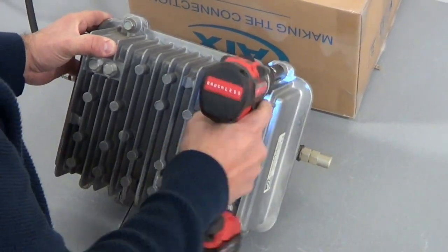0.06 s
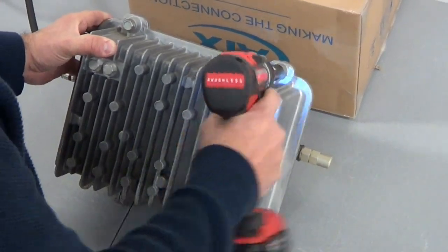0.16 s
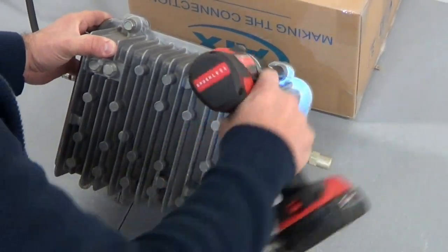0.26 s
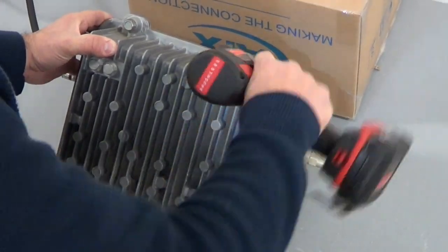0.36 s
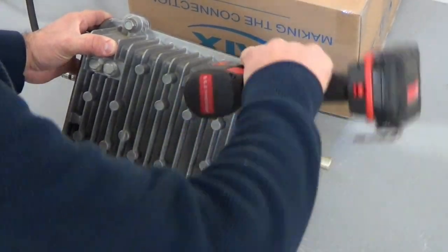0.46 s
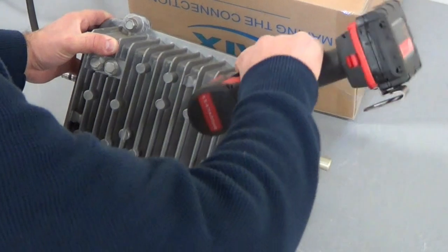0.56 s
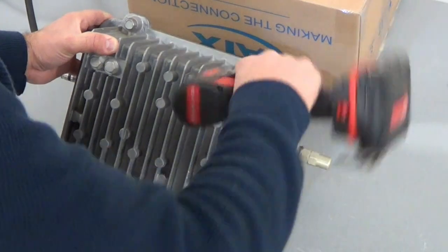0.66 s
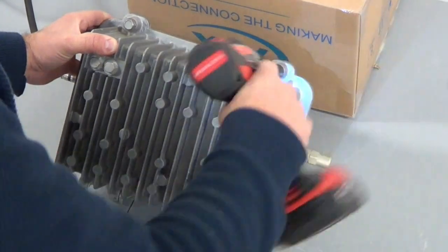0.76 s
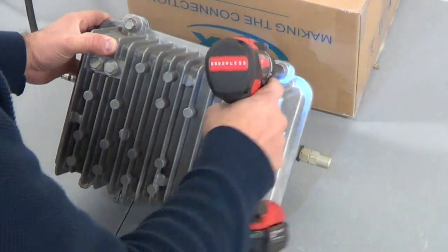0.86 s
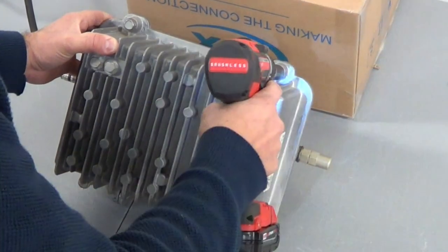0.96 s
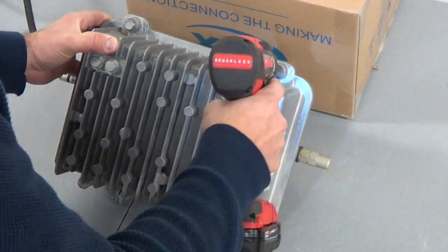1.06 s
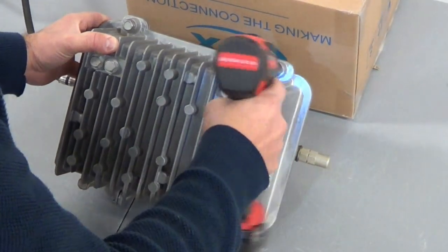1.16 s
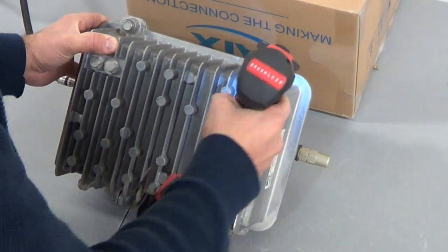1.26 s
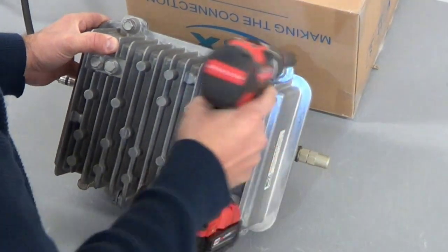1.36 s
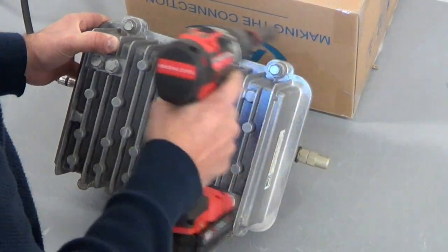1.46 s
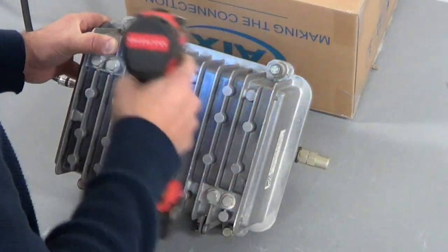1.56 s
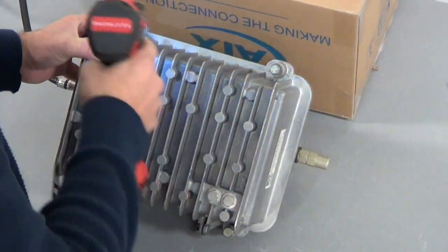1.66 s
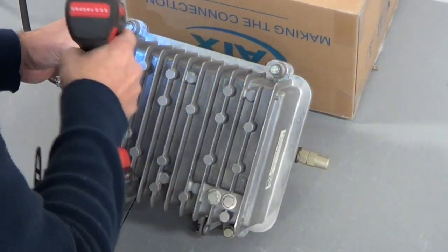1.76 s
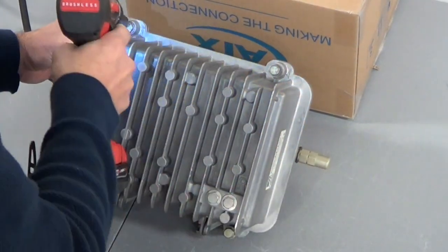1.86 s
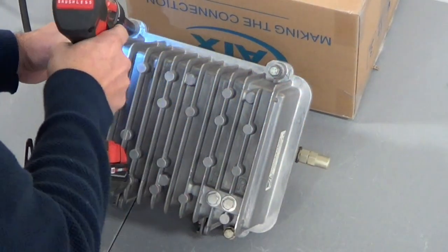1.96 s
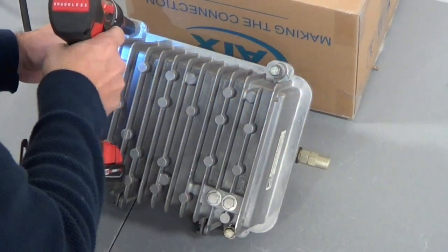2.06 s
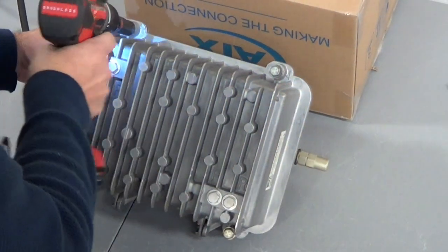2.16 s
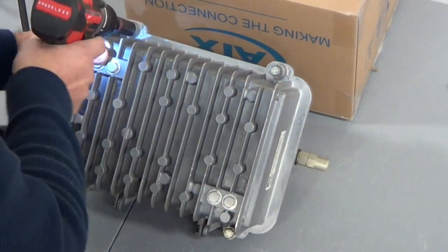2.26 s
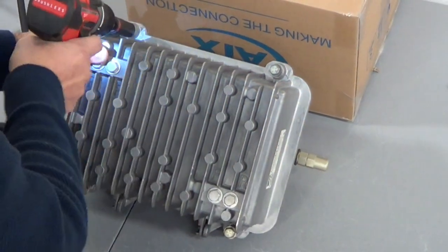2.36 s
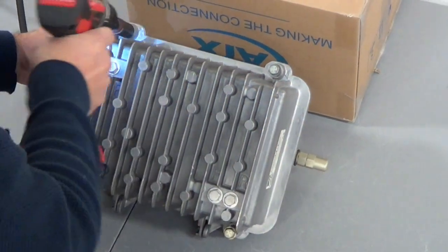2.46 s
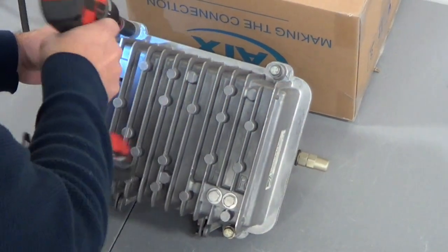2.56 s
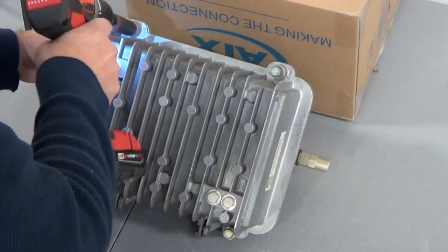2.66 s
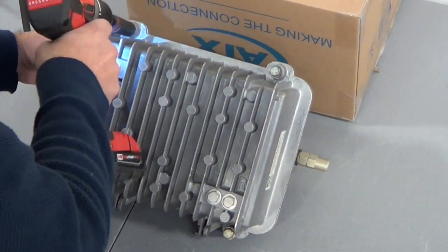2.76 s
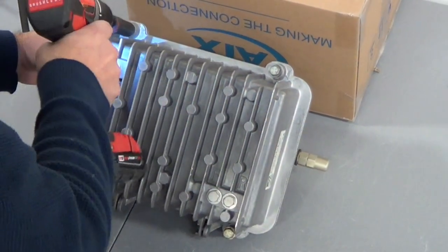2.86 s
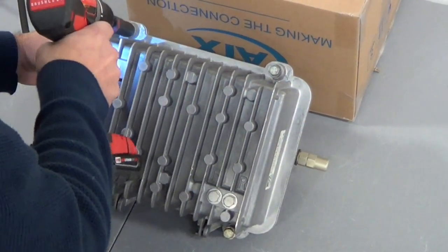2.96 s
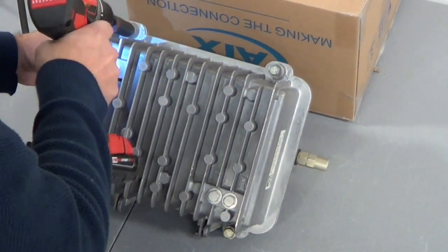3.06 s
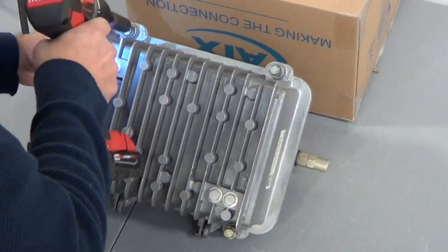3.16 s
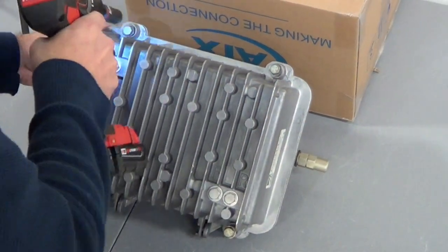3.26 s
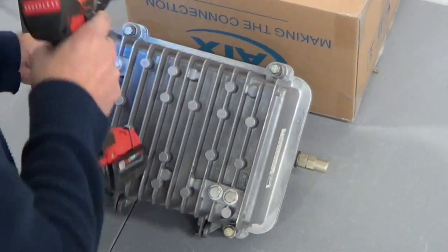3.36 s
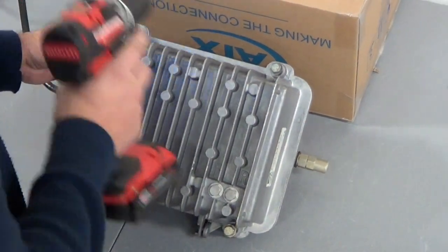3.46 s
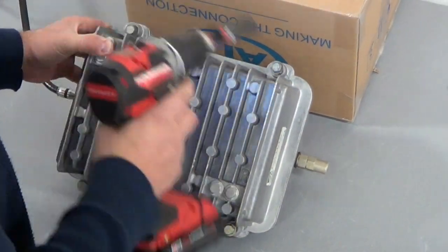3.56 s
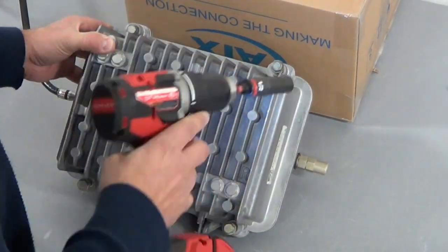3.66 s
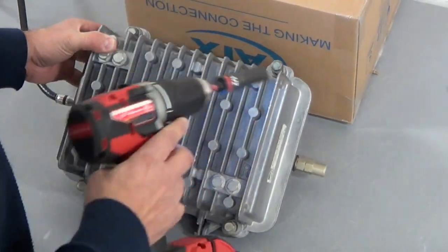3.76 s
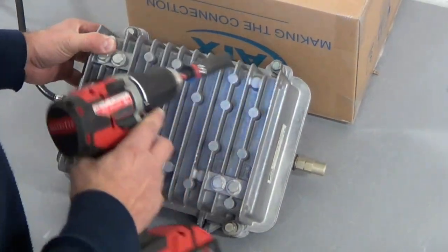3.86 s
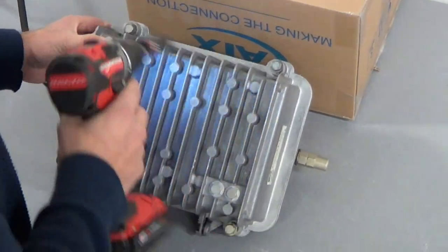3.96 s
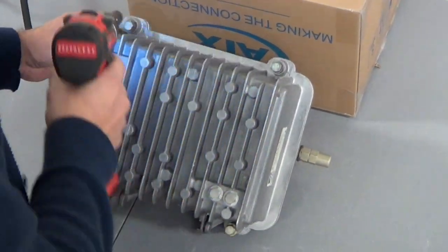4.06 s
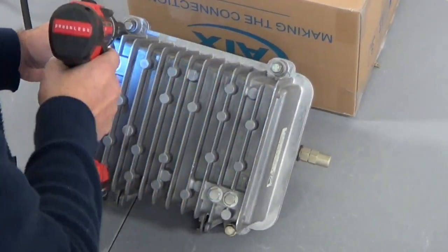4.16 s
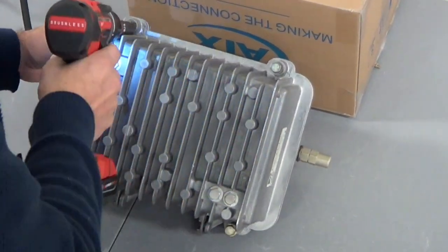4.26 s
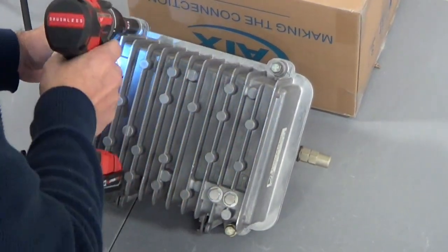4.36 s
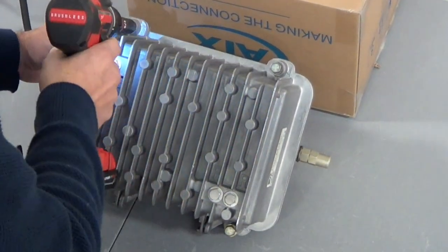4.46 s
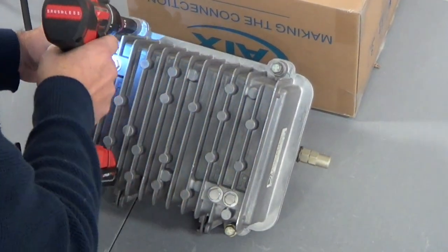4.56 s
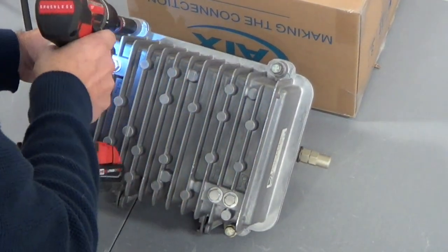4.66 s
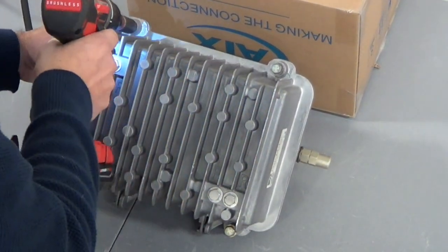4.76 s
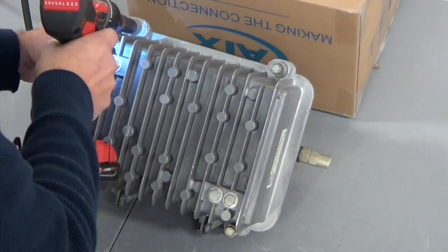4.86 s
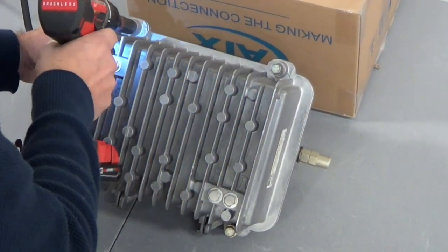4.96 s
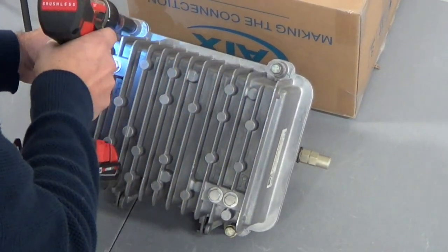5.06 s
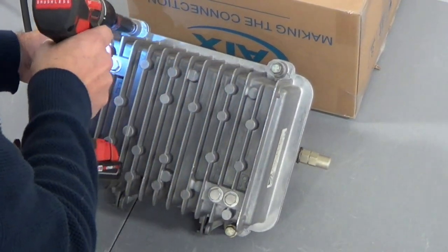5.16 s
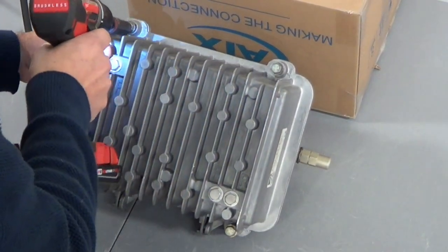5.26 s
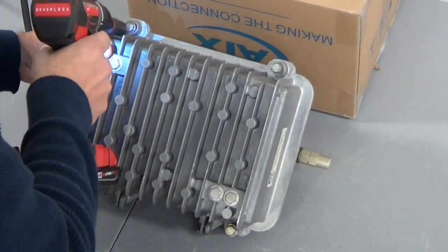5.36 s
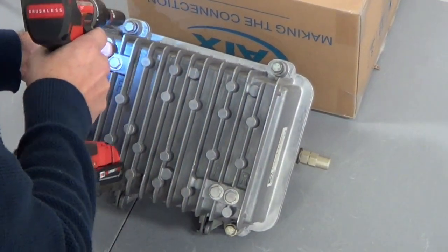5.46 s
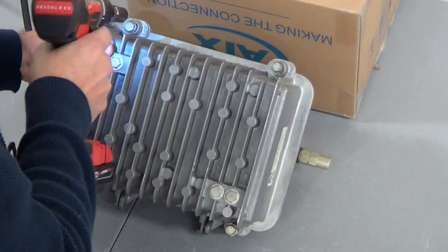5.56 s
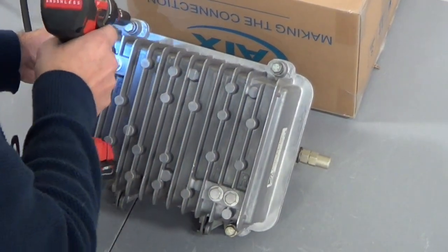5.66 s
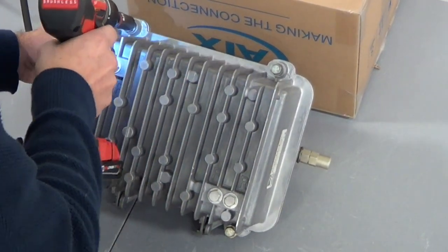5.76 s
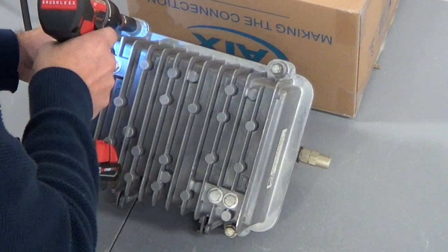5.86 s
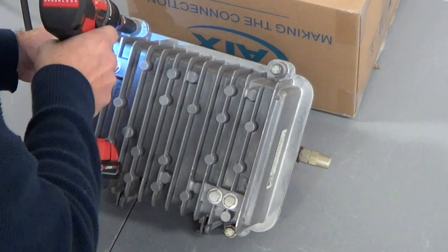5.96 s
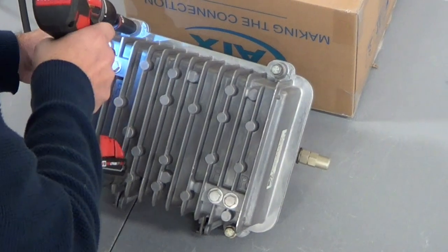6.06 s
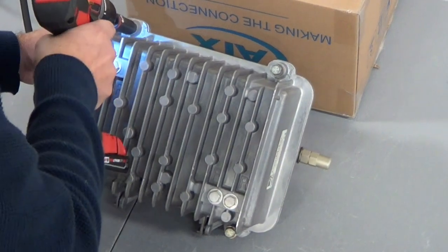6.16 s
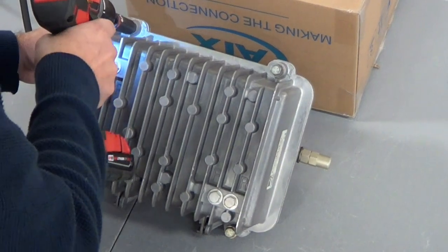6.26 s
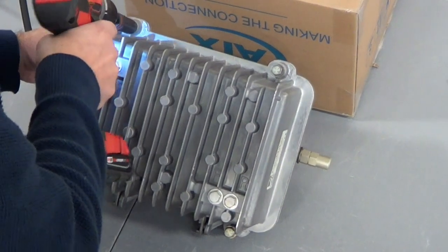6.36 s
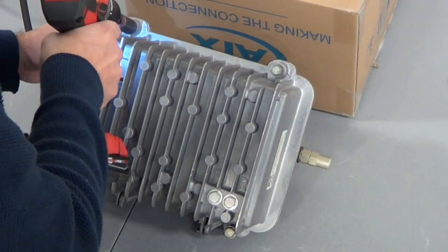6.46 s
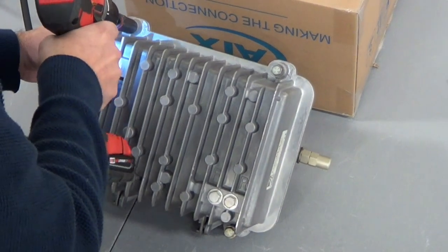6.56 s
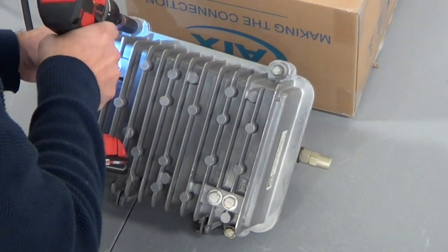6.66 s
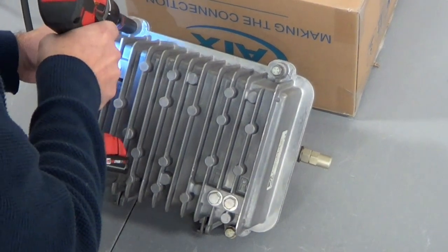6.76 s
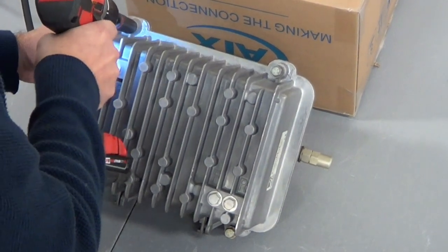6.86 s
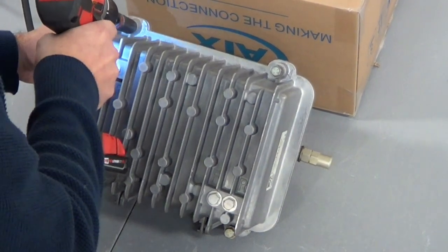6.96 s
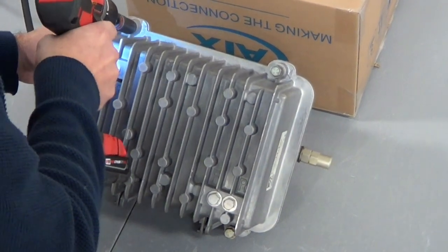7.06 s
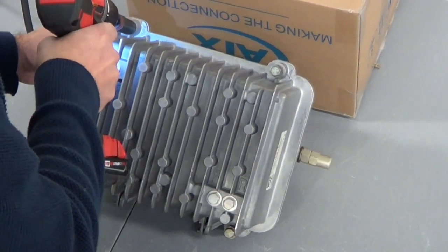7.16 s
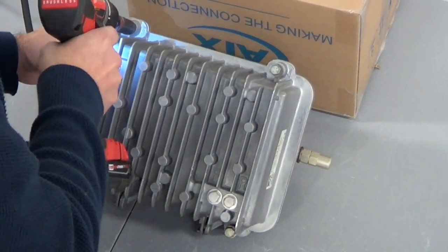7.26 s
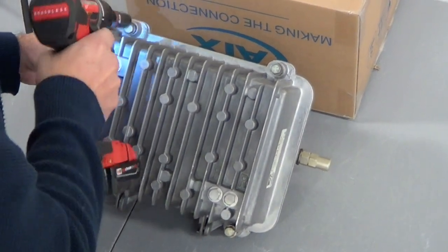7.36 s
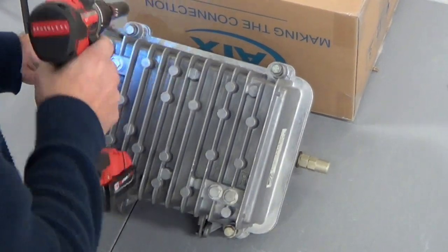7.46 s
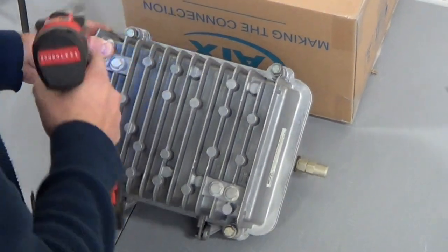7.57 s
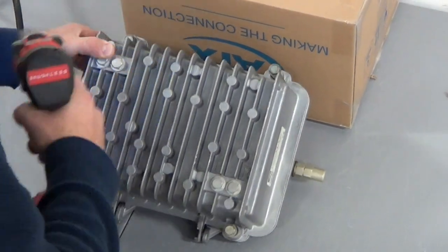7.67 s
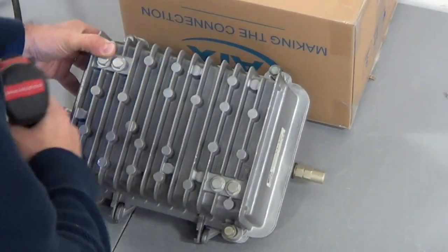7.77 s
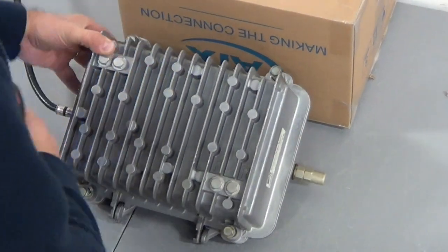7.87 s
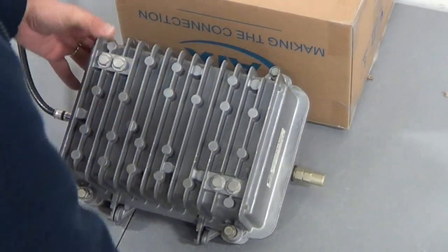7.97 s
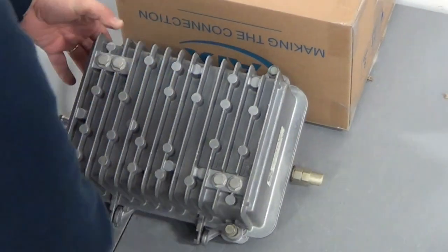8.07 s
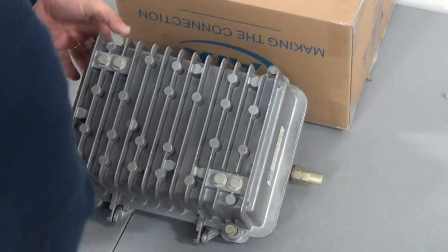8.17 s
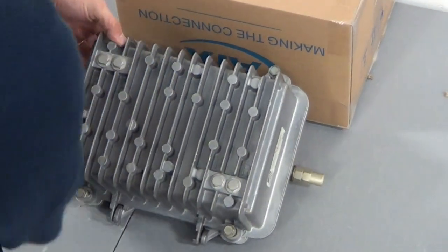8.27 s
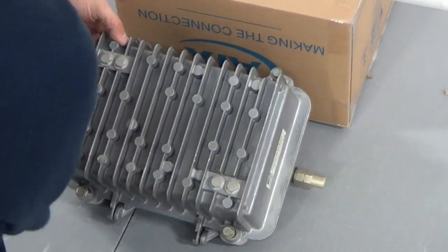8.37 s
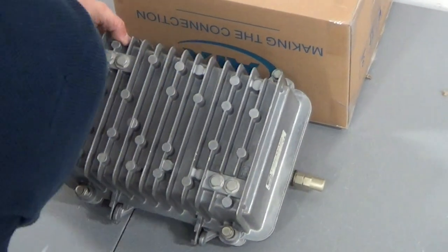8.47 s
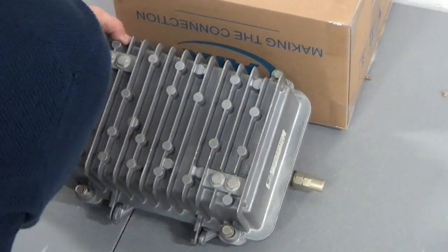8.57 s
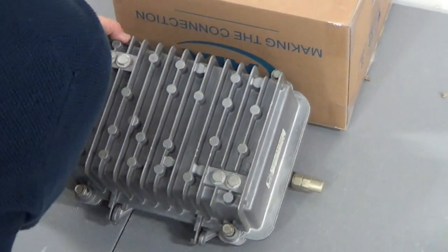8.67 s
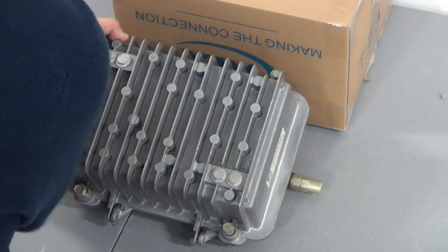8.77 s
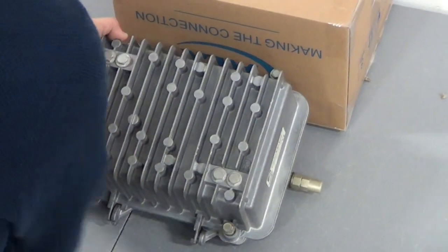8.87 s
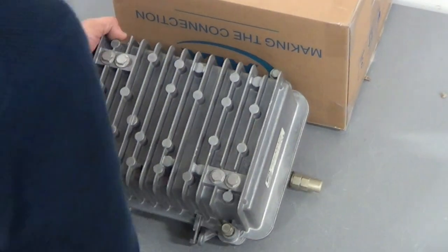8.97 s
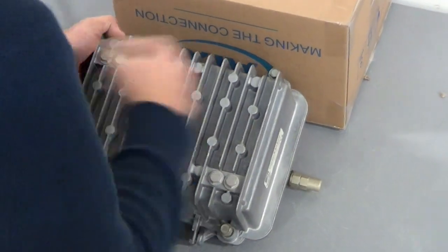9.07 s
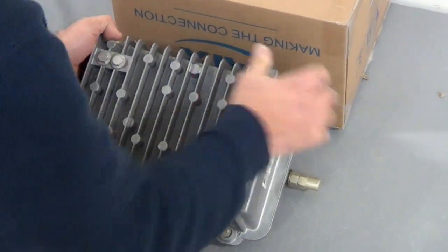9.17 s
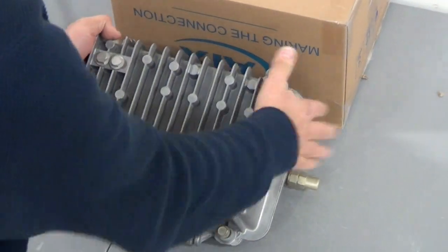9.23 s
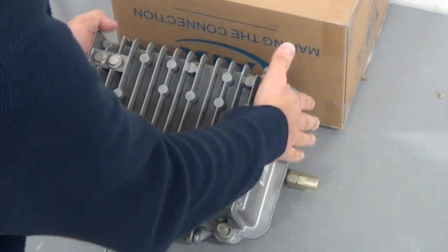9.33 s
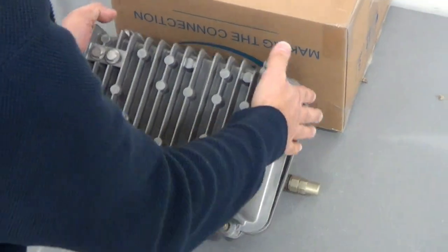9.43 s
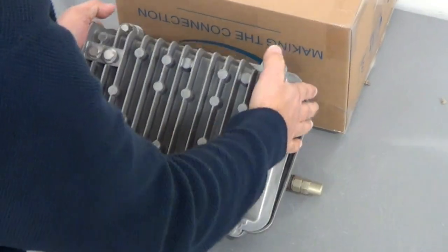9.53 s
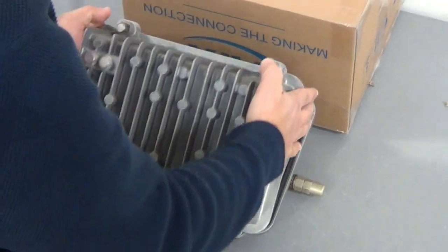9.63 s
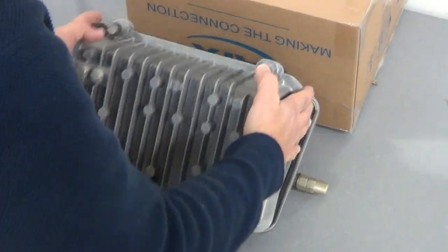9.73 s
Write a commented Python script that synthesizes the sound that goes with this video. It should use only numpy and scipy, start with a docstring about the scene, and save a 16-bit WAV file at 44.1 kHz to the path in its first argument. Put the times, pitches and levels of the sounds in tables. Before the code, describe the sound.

Close in a hard, echoing room, a cordless drill is already spinning with a clean buzz that quickly winds down. Four more pulls follow, with grinding gear chatter, thin whine and low grip rumble sagging under load. Bright socket taps crack against the cast metal housing between and during them. Finally the drill thuds down on the table, and the casting clunks, clatters and scrapes as it is lifted.

```python
"""A cordless drill is already spinning, buzzing cleanly, in a hard, echoing room; four more short pulls follow.
Its pulls on the bolts of a cast metal housing are gear chatter through resonances, plus grip rumble and mesh whine.
Between and during pulls the socket taps, some with a wall echo: noise cracks ringing the socket and casting.
At the end the drill is put down and the housing clunks as it is lifted: shaped noise for thud, clatter and scrape.
Air noise, faint tones and sparse decaying echoes make the room."""
import sys
import numpy as np
from scipy import signal
from scipy.fft import rfft, irfft
from scipy.io import wavfile
from scipy.ndimage import uniform_filter1d

SR = 44100
rng = np.random.default_rng(int(sys.argv[2]) if len(sys.argv) > 2 else 0)


def wav_out(sig):
    """Save sig, one row per channel (or a flat mono array), as 16-bit PCM at SR to the path in sys.argv[1]."""
    wavfile.write(sys.argv[1], SR, np.round(np.clip(np.atleast_2d(sig).T, -1, 1) * 32767).astype(np.int16))


N = 432180


def amp(db):
    """Decibels to amplitude ratio."""
    return 10 ** (np.asarray(db) / 20)


def unit(x):
    """Scales to rms 1."""
    return x / np.sqrt(np.mean(x ** 2) + 1e-20)


def read(points, hz):
    """Interpolates a frequency table along log frequency."""
    f, value = np.transpose(points)
    return np.interp(np.log(hz + 1), np.log(f + 1), value)


def add(mix, start_s, sound):
    """Adds a sound into the mix at its start time, cut at the end."""
    part = mix[round(start_s * SR):][:len(sound)]
    part += sound[:len(part)]


def colour(x, points):
    """Filters by a spectrum table; its end values hold beyond its ends."""
    hz = np.fft.rfftfreq(len(x), 1 / SR)
    return irfft(rfft(x) * amp(read(points, hz)), len(x))


def resonate(x, hz, width_hz):
    """Shifts hz down to zero, smooths, and shifts back: a resonance of gain 1."""
    turn = np.exp(2j * np.pi * np.cumsum(hz * np.ones(len(x))) / SR)
    r = np.exp(-np.pi * width_hz / SR)
    return 2 * (turn * signal.lfilter([1 - r], [1, -r], x / turn)).real


def wander(size, per_s):
    """Random line through Gaussian points drawn per_s times a second."""
    steps = rng.standard_normal(int(size * per_s / SR) + 2)
    return np.interp(np.arange(size) * per_s / SR, np.arange(len(steps)), steps)


def rattle(size, per_s, spread_db):
    """Noise whose level wanders about per_s times a second, as from loose parts knocking."""
    return unit(rng.standard_normal(size) * amp(spread_db * wander(size, per_s)))


def spread(rows):
    """Start time and the columns of a curve table at every sample."""
    s, *columns = np.transpose(rows)
    t = np.arange(s[0], s[-1], 1 / SR)
    return s[0], [np.interp(t, s, c) for c in columns]


# room hush, spectrum: (frequency [Hz], relative density [dB])
AIR_SPECTRUM = [(18, -23), (30, -14.5), (64, -2.5), (295, 0), (384, 0), (461, -4), (512, 0), (684, -14.5),
                (801, -12), (3980, -20), (7270, -24), (14000, -28), (16000, -9.5)]
# room hush, loudness: (time [s], level [dB])
AIR_LEVEL = [(0, -52.5), (1.9, -54.5), (3.9, -47.5), (6.3, -48), (8.3, -47), (9.8, -43)]
# steady room tones: (frequency [Hz], relative level [dB])
ROOM_TONES = [(668, -58), (15735, -85)]
# stereo width, also shapes room() and nearby(): (frequency [Hz], relative side level [dB])
SIDE_SPECTRUM = [(60, -19), (110, -19.5), (200, -16), (380, -12.5), (700, -11), (1290, -11.5),
                 (2380, -14.5), (4400, -9.5), (8120, -12), (15000, -39)]


def air():
    """Coloured noise and a few faint sines: mid and side."""
    t = np.arange(N) / SR
    level = amp(np.interp(t, *np.transpose(AIR_LEVEL)))
    mid, side = (unit(colour(rng.standard_normal(N), AIR_SPECTRUM)) * level for _ in range(2))
    for hz, db in ROOM_TONES:
        mid = mid + amp(db - 2) * np.sin(2 * np.pi * hz * t)
    return np.array([mid, amp(4) * colour(side, SIDE_SPECTRUM)])


# reverberation: (frequency [Hz], time to fall 60 dB [s])
ROOM_DECAY = [(150, 0.97), (400, 0.92), (1000, 1.), (2800, 0.98), (5000, 0.71), (8000, 0.4), (14000, 0.27)]


def room(x):
    """Sparse echoes of random sign, each band dying at its own speed: mid and side."""
    echoes = np.zeros((2, SR))
    # one echo in every 20 samples
    at = np.arange(400, SR - 20, 20) + rng.integers(0, 20, (2, (SR - 401) // 20))
    np.put_along_axis(echoes, at, rng.choice([-1., 1.], at.shape), 1)
    hz, t, z = signal.stft(echoes, SR, nperseg=256)
    decay = amp(-60 * t / read(ROOM_DECAY, hz)[:, None])
    tail = signal.istft(z * decay, SR, nperseg=256)[1]
    tail = tail / np.linalg.norm(tail[0])
    mid, side = signal.fftconvolve(x[None], tail, axes=1)[:, :N]
    return np.array([mid, amp(1.5) * colour(side, SIDE_SPECTRUM)])


def nearby(x):
    """First echoes off table and wall reach the two sides differently: a side signal."""
    echoes = rng.standard_normal(700) * np.exp(-np.arange(700) / 250)
    return colour(signal.oaconvolve(x, echoes / np.linalg.norm(echoes))[:N], SIDE_SPECTRUM)


# brief high rustle, one row: (start [s], length [s], relative level [dB], squeak frequency [Hz])
RUSTLE = (9.265, .075, -52, 11800)


def rustle():
    """Broad high noise with one thin squeak in it."""
    s, length_s, db, hz = RUSTLE
    noise = rattle(round(length_s * SR), 147, 3.0)
    broad = unit(resonate(resonate(noise, 0.95 * hz, 4000.), 0.76 * hz, 4000.))
    squeak = unit(resonate(noise, hz, 80.))
    return s, amp(db) * (broad + 0.61 * squeak) * signal.windows.tukey(len(noise), .3)


# small clicks of trigger, chuck and fingers, and the bright crack of the heavy thump:
# (time [s], relative level [dB], centre frequency [Hz])
CLICKS = [(0.9202, -38, 4840), (1.589, -45, 7100), (3.5867, -30, 11200), (3.624, -32, 10900),
          (4.0128, -42, 7860), (4.046, -30, 5130), (8.577, -7, 4300), (8.5717, -14, 7500),
          (8.6494, -21, 6480), (8.8288, -37, 6660), (9.7767, -19.5, 11400)]


def clicks():
    """Fast-dying broad noise around one pitch, differentiated."""
    out, t = np.zeros(N), np.arange(1500) / SR
    for s, db, hz in CLICKS:
        puff = unit(resonate(rng.standard_normal(len(t)), hz, 3400.0))
        envelope = amp(db - 12.0 - 60 * t / 0.036)
        add(out, s, envelope * signal.lfilter([1, -1], 1, puff))
    return out


# metal dragged or rattling on the table: (start [s], end [s], level [dB], frequency [Hz], width [Hz])
SCRAPES = [(8.577, 8.608, -29.5, 2130, 510), (8.951, 8.966, -53, 1860, 500), (9.013, 9.05, -56, 1980, 300),
           (9.005, 9.094, -53, 1170, 120), (9.37, 9.418, -40.5, 2910, 352),
           (9.383, 9.422, -36.5, 5630, 1540), (9.41, 9.436, -33.5, 2080, 300),
           (9.384, 9.437, -35.5, 874, 200)]


def scrape(s, end_s, db, hz, width_hz):
    """Quick slips heard through two stacked resonances at one pitch."""
    size = round((end_s - s) * SR)
    slips = rattle(size, 307, 4.7)
    rung = resonate(resonate(slips, hz, width_hz), hz, 2 * width_hz)
    return s, amp(db) * unit(rung) * signal.windows.tukey(size, .4)


# table top modes: (frequency [Hz], width [Hz], level re direct sound [dB])
TABLE_MODES = [(66, 12, 0), (135, 22, -3)]


def boom(x):
    """Adds the ring of the table top; returns rms 1."""
    return unit(x + sum(amp(db) * unit(resonate(x, hz, width_hz)) for hz, width_hz, db in TABLE_MODES))


# heavy parts landing and scraping on the table:
# (start [s], rise [s], thud level [dB], clatter re thud [dB], time to fall 60 dB [s])
CLUNKS = [(3.82, 0.0026, -36.5, -31, 0.61), (4.402, 0.012, -37, -30, 0.96), (7.68, 0.0032, -28, -10, 0.33),
          (8.561, 0.0043, -17.5, -10, 0.33), (8.566, 0.0066, -17.5, -13.5, 0.83),
          (8.939, 0.0047, -38, -6.5, .25), (9.009, 0.006, -30.5, -9.5, 0.12), (9.362, 0.01, -44, 4.5, 0.22),
          (9.402, 0.0055, -26, -0.5, 0.36), (9.466, 0.004, -17, -10.5, 0.46), (9.478, 0.0078, -18, 5, 0.56),
          (9.529, 0.013, -27, -12, 0.25)]
# table thud: (frequency [Hz], relative density [dB])
THUD_SPECTRUM = [(18, -51), (30, -40), (47, -29), (65, -4.5), (98, -11.5), (128, -5.5), (160, -12.5),
                 (205, -8.5), (371, -7), (800, -23.5), (1040, -88), (1760, -120)]
# casting clatter: (frequency [Hz], relative density [dB])
CLATTER_SPECTRUM = [(410, 3), (700, 4.5), (747, -3), (919, 4), (1160, -3.5), (2220, -0.5), (2660, -8.5),
                    (5860, -18.5), (7700, -20.5), (15500, -36)]


def clunk(s, rise_s, db, clatter_db, t60_s):
    """The table booms and the casting clatters in uneven contacts."""
    t = np.arange(0, rise_s + t60_s, 1 / SR)
    thud = boom(unit(colour(rattle(len(t), 60, 0.52), THUD_SPECTRUM)))
    clatter = unit(colour(rattle(len(t), 250, 1.1), CLATTER_SPECTRUM))
    shape = np.minimum(t / rise_s, 1) * amp(db - 60 * np.maximum(t - rise_s, 0) / t60_s)
    return s, shape * (thud + amp(clatter_db) * clatter)


# socket taps and, for some, their wall echoes about 17 ms later:
# (time [s], near peak [dB], brightness tilt [dB], strongest ring [Hz])
TAPS = [(1.34, -16, 0.5, 3770), (2.031, -12, -2.5, 2570), (2.041, -11.5, -3, 1670), (2.06, -17.5, 0, 2310),
        (2.301, -8, -1, 3080), (2.318, -16.5, -8, 2060), (2.79, -8, 5, 7660), (2.842, -9, 5, 6700),
        (2.942, -10, -1, 4860), (3.049, -6.5, -2, 3480), (3.146, -5, 2, 8040), (3.225, -10.5, -0.5, 4840),
        (4.213, -4.5, 2.5, 3920), (4.23, -8.5, 2, 1350), (4.393, -17, 0.5, 1050), (4.411, -15, -2.5, 960),
        (4.474, -20.5, -1, 1030), (4.487, -18.5, -2.5, 4800), (4.532, -6.5, 0.9, 4900),
        (5.073, -1, -3.5, 4200), (5.11, -15.5, 0, 4200), (5.804, -10.5, 1, 4030), (5.82, -20, -8, 5300),
        (5.901, -26, -20, 925), (5.913, -16, -2.5, 5000), (5.939, -24, -8, 1300), (5.953, -27, -9, 1190),
        (5.997, -17, -7, 1290), (6.003, -15, 0.5, 1000), (6.021, -21, -12, 1500), (6.38, -9, -1, 7500),
        (7.055, -10.5, 16, 7240), (7.181, -10, 18, 8900), (7.282, -8, 25, 7400)]
# broad modes of socket and casting: (frequency [Hz], relative level [dB])
RING_MODES = [(1400, -6), (2320, -8), (4000, 6), (4850, 6.5), (6300, 10.5), (7500, 8), (9100, 10)]
# narrower housing modes, longer ring: (frequency [Hz], width [Hz], relative level [dB])
CASTING_MODES = [(694, 60, 0), (1050, 80, -3), (1380, 70, -3), (1593, 80, -4), (2320, 45, 0),
                 (4800, 90, -5)]


def taps():
    """Short cracks, each with its own pitch, ring the housing; the room gets a broader blow: near and far."""
    (near, far), t = np.zeros((2, N)), np.arange(9000) / SR
    for s, db, tilt_db, own_hz in TAPS:
        blow = rng.standard_normal(len(t)) * amp(-60 * t / 0.048) * np.minimum(t / 0.0012, 1)
        ring = blow + amp(-1.0) * sum(amp(d) * resonate(blow, hz, 350.0) for hz, d in RING_MODES)
        hum = amp(5.) * sum(amp(d) * resonate(blow, hz, width_hz) for hz, width_hz, d in CASTING_MODES)
        shade = [(40, -21.5), (120, 4.0), (400, -2.0), (900, -tilt_db), (3000, 2.0),
                 (12000, 2 * tilt_db - 6.0), (16000, -13.0)]
        sound = colour(ring + hum + amp(10.0) * resonate(blow, own_hz, 470.0), shade)
        peak = abs(sound).max()
        add(near, s - .0015, amp(db) * sound / peak)
        add(far, s - .0015, amp(db + 2) * colour(ring + hum, shade) / peak)
    return near, far


# socket rattling on a loosened bolt: (start [s], end [s], level [dB])
LOOSE = [(2.947, 3.194, -27.5), (7.095, 7.443, -30)]
SOCKET_HZ = 2336


def loose(s, end_s, db):
    """Uneven knocks into the socket's main resonance."""
    size = round((end_s - s) * SR)
    rung = unit(resonate(rattle(size, 42.2, 12.0), SOCKET_HZ, 92.0))
    return s, amp(db) * rung * signal.windows.tukey(size, .2)


# speed controller as the trigger is squeezed: (start [s], level before decay [dB])
WHISTLES = [(.968, -35), (2.482, -33), (4.707, -23.5), (6.357, -29)]
WHISTLE_HZ = 7780


def whistle(s, db):
    """A short high sine with a soft onset and fast decay."""
    t = np.arange(1500) / SR
    return s, amp(db - 250. * t) * np.sin(2 * np.pi * WHISTLE_HZ * t) * signal.windows.tukey(len(t), .5)


# motor harmonics: (multiple of turning rate [1], relative level [dB])
BUZZ_HARMONICS = [(1, -15.5), (2, -7), (3, 1.5), (4, -7.5), (5, -35.5), (6, -5.5), (7, -3.5), (8, -2),
                  (9, 0), (10, -1), (11, 1.5), (13, -13), (15, -11.5), (16, 4), (17, -9.5)]
BUZZ_DB = -25.5


def buzz():
    """Clean harmonics of the motor's turning in the first pull, each drifting a little in strength."""
    s, (mesh_hz,) = spread(SPEEDS[0])
    size, t = len(mesh_hz), np.arange(len(mesh_hz)) / SR
    hz = mesh_hz / TEETH
    turns = np.cumsum(hz) / SR
    blur_db = -.05 * abs(hz - hz[0])  # times multiple: upper harmonics fade most off the opening speed
    dip_db = -6 * np.exp(-((t - .235) / 0.069) ** 2)  # the buzz breaks as the speed jumps
    stack = 0
    for k, d in BUZZ_HARMONICS:
        level = amp(d + k * blur_db + 2.7 * wander(size, 13))
        stack = stack + level * np.cos(2 * np.pi * (k * turns + rng.random()))
    fade_db = COAST_DB_PER_S * np.maximum(t - .45, 0)
    return s, amp(BUZZ_DB + fade_db + dip_db) * stack / np.std(stack[:12000])


# pitches the gearbox favours: (frequency [Hz], gain [dB])
WHINE_RESPONSE = [(3000, -20), (3300, -9), (3650, 0), (4000, -7), (4300, -16), (6000, -14), (6500, -4),
                  (7400, 0), (8000, -2), (8600, -12)]
# whine breaking into a squeal: (middle [s], length [s], multiple of mesh [1], relative level [dB])
SQUEALS = [(1.19, .04, 2, -25), (1.24, .09, 2, -22), (1.26, .07, 1, -26), (1.295, .04, 2, -28),
           (3.09, .09, 1, -30), (5.385, .11, 1, -29), (6.58, .05, 1, -30), (6.755, .08, 1, -26),
           (4.74, .035, 1, -27)]
SLOWING_DB = -9  # octave, while the motor loses speed


def whine(row, speed):
    """Tooth mesh and its octave as unsteady, fuzzy lines coloured by the gearbox."""
    start, let_go, rise_s = row[:3]
    s, (mesh_hz,) = spread(speed)
    size = len(mesh_hz)
    t = s + np.arange(size) / SR
    slowing = uniform_filter1d(1. * (np.gradient(mesh_hz) < 0), 400)
    mesh_hz = mesh_hz * (1 + 0.0019 * wander(size, 39))
    pull_db = COAST_DB_PER_S * np.maximum(t - let_go, 0) - RISE_DB * np.exp((start - t) / rise_s)
    out = 0
    for k, db in zip((1, 2), row[-2:]):
        level = amp(db + (k - 1) * SLOWING_DB * slowing + read(WHINE_RESPONSE, k * mesh_hz) + pull_db)
        for middle, length_s, multiple, d in SQUEALS:
            if multiple == k:
                level = level + amp(d) * np.maximum(1 - (2 * (t - middle) / length_s) ** 2, 0)
        line = np.sin(2 * np.pi * k * np.cumsum(mesh_hz) / SR)
        fuzz = unit(resonate(rng.standard_normal(size), k * mesh_hz, 60.))
        out = out + level * (line + 0.7 * fuzz)
    return s, out * amp(3.44 * wander(size, 49.86) - 0.5) * signal.windows.tukey(size, .1)


CLUMP_DB = 1.6


def clumped(x):
    """Grinding swells and thins in patches a few hundred Hz wide and some 30 ms long."""
    z = signal.stft(x, nperseg=256)[2]
    smooth_hz = uniform_filter1d(rng.standard_normal(z.shape), 4, 0)
    patches = unit(uniform_filter1d(smooth_hz, 9, 1))
    return signal.istft(z * amp(CLUMP_DB * patches), nperseg=256)[1][:len(x)]


# trigger pulls: (start [s], let go [s], rise [s], chatter [dB], brightness [dB], rumble re chatter [dB],
# rumble change [dB/s], whine [dB], octave whine [dB]); base levels, before load and pitch response
PULLS = [(-.2, 0.558, 0.018, -18.5, 8, -59, 28, -55, -57),
         (0.966, 1.266, 0.02, -22.5, 0.5, -20, 4, -31.5, -38),
         (2.486, 3.171, 0.012, -18.5, -3, -14.5, -5, -26, -26),
         (4.713, 5.37, 0.01, -17, 0, -17.5, -26, -25.5, -32),
         (6.365, 7.357, 0.0089, -16.5, 0, -13.5, -11.5, -26, -26)]
# one curve per pull, sagging where the bolt holds: (time [s], tooth mesh frequency [Hz])
SPEEDS = [
    [(0, 3520), (.2, 3530), (.25, 3620), (.31, 3550), (.41, 3460), (.5, 2750), (.62, 2500)],
    [(.968, 3100), (1.1, 4050), (1.185, 4250), (1.21, 3680), (1.235, 3650), (1.29, 3350), (1.4, 2800)],
    [(2.484, 3000), (2.55, 3350), (2.58, 3750), (2.65, 4100), (2.69, 3750), (2.78, 3480), (2.85, 3250),
     (3.03, 3150), (3.08, 3450), (3.3, 3100)],
    [(4.708, 3100), (4.79, 3700), (4.84, 4100), (4.92, 4230), (5.2, 4250), (5.28, 4000), (5.33, 3700),
     (5.43, 3450), (5.52, 3000)],
    [(6.365, 3000), (6.455, 3700), (6.5, 4020), (6.6, 3300), (6.7, 3220), (6.75, 3650), (6.84, 4200),
     (7.2, 4255), (7.32, 3850), (7.56, 3100)],
]
# gear chatter: (frequency [Hz], relative density [dB])
CHATTER_SPECTRUM = [(100, -62), (290, -33), (500, -9.5), (1190, 0.5), (1420, 0), (2390, -0.5), (2730, -2.5),
                    (7640, 2), (12700, -5), (16000, -11)]
# grip rumble: (frequency [Hz], relative density [dB])
RUMBLE_SPECTRUM = [(18, -42.5), (30, -38), (54, -22.5), (86, -10), (140, -1), (175, 0), (226, -3),
                   (342, 5.5), (406, 1.5), (563, 8.5), (900, -16.5), (1170, -16.5), (1980, -120)]
# housing and gearbox modes: (frequency [Hz], width [Hz], relative level [dB])
BODY_MODES = [(1037, 29, 0.5), (1188, 54, 0), (1705, 69, 3), (2334, 60, 1.5), (3058, 26, 2),
              (3480, 1400, -3), (4010, 30, -1), (4180, 33, -4.5), (4880, 81, -4), (5510, 100, -4.5),
              (6730, 37, -11.5), (7390, 45, -7.5), (8730, 150, -6.5), (10360, 70, -14), (13620, 50, 5)]
# chatter dip between pulls, only its faint edge reaches one: (middle [s], half length [s], change [dB])
DIP = (3.6, 0.15, -5)
TEETH = 17  # mesh cycles a motor turn
RISE_DB = 27  # how far under its level a pull starts
SAG_DB, STRAIN_DB = -4, 4  # chatter and rumble change, times the share of top speed lost
COAST_DB_PER_S, DULL_DB_PER_S, JOLT_DB_PER_S = -130, -52.5, 113  # chatter, brightness, rumble once let go
THICKEN = 0.13  # share of speed lost over which a pull gives up its own brightness


def burst(row, speed):
    """Gear chatter, louder once a motor turn, rings the housing; the grip rumbles."""
    start, let_go, rise_s, level_db, bright_db, grip_db, grip_db_per_s = row[:7]
    s, (mesh_hz,) = spread(speed)
    size = len(mesh_hz)
    t = s + np.arange(size) / SR
    lost = 1 - mesh_hz / mesh_hz.max()
    coast_s = np.maximum(t - let_go, 0)

    db = level_db - RISE_DB * np.exp((start - t) / rise_s) + SAG_DB * lost + COAST_DB_PER_S * coast_s
    dip_s, dip_half_s, dip_db = DIP
    db = db + dip_db * np.exp(-((t - dip_s) / dip_half_s) ** 2)
    rumble_db = grip_db + grip_db_per_s * (t - s) + STRAIN_DB * lost + JOLT_DB_PER_S * coast_s
    tilt_db = bright_db * np.exp(-(lost / THICKEN) ** 2) + DULL_DB_PER_S * coast_s

    turns = np.cumsum(mesh_hz / TEETH) / SR
    per_turn = 1 + 0.15 * np.cos(2 * np.pi * turns)
    knocks = rattle(size, 900, 2.4) * amp(1.2 * wander(size, 30)) * per_turn
    rung = sum(amp(d + 2.5 * wander(size, 15)) * resonate(knocks, hz, width_hz)
               for hz, width_hz, d in BODY_MODES)
    chatter = unit(clumped(colour(knocks + amp(0.5) * rung, CHATTER_SPECTRUM)))

    # positive tilt: thin and bright, as when spinning free
    treble = colour(chatter, [(5000, -30), (9000, -3), (14000, 0)])
    lows = colour(chatter, [(1500, 0), (2500, -3), (4000, -30)])
    chatter = chatter + (amp(tilt_db) - 1) * treble + (amp(-np.maximum(tilt_db, -7)) - 1) * lows

    rumble = boom(unit(colour(rattle(size, 60.64, 3.9), RUMBLE_SPECTRUM)))
    sound = amp(db) * (chatter + amp(rumble_db) * rumble)
    return s, sound * np.minimum(1, np.arange(size)[::-1] / 300)


def scene():
    """Places every source, then adds room, air and stereo: left and right."""
    drill, tones, parts = np.zeros((3, N))
    for row in CLUNKS:
        add(parts, *clunk(*row))
    for row in SCRAPES:
        add(parts, *scrape(*row))
    small = clicks()
    add(small, *rustle())
    tapped, far = taps()
    for row in LOOSE:
        add(drill, *loose(*row))
    for row in WHISTLES:
        add(tones, *whistle(*row))
    add(tones, *buzz())
    for row, speed in zip(PULLS, SPEEDS):
        add(tones, *whine(row, speed))
        add(drill, *burst(row, speed))

    send = amp(-9.0) * drill + amp(-5.5) * tones + amp(-7.0) * (far + small) + amp(-8.5) * parts
    mid, side = room(send) + air()
    near = drill + tones + tapped + small + parts
    side = side + amp(-16.5) * nearby(near) - 0.12 * parts - 0.0071 * near  # all a little to the right
    return np.array([mid + near + side, mid + near - side])


# bass gain, held until the next row: (time [s], gain [dB])
BASS_STEPS = [(0, -7), (.47, -1), (3.82, -1.5), (7.02, -2), (7.28, -7.5), (7.68, -2.5), (8.683, -4),
              (9.36, -0.5)]
BASS_HZ, EDGE_HZ = 746, 15950  # top of the stepped band, top of the sound
CEILING = .75  # full scale = 1


def record(dry):
    """The bass band changes level in steps, peaks are softly rounded; then the band limit."""
    s, db = np.transpose(BASS_STEPS)
    step = np.searchsorted(s, np.arange(N) / SR, "right") - 1
    gain = uniform_filter1d(amp(db)[step], 150)
    bass = signal.oaconvolve(dry, signal.firwin(801, BASS_HZ, fs=SR)[None], "same")
    rounded = CEILING * np.tanh((dry + (gain - 1) * bass) / CEILING)
    band_limit = signal.firwin(511, EDGE_HZ, window=("kaiser", 9), fs=SR)
    return signal.oaconvolve(rounded, band_limit[None], "same")


dry = scene()
out = record(dry)
wav_out(out)
```